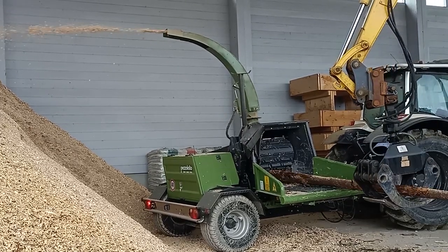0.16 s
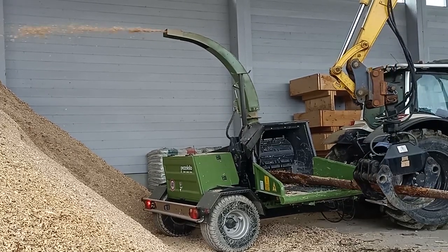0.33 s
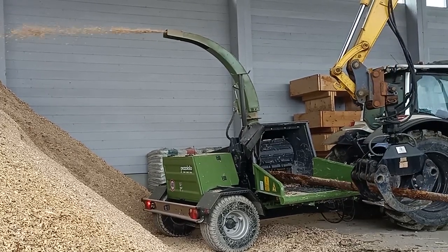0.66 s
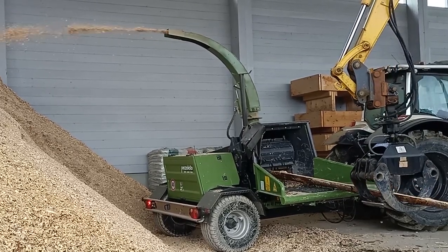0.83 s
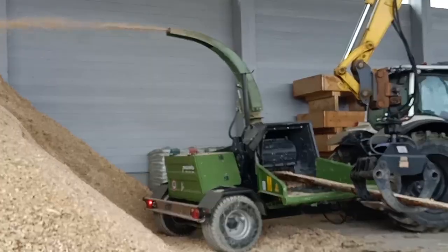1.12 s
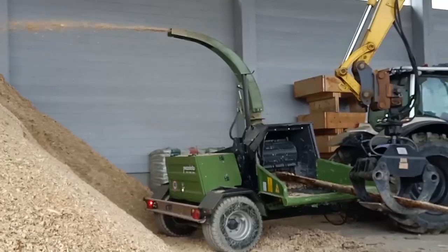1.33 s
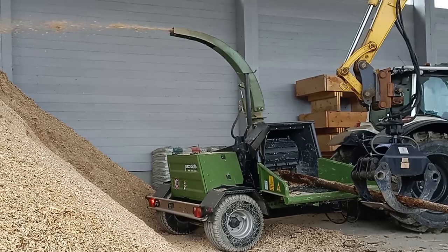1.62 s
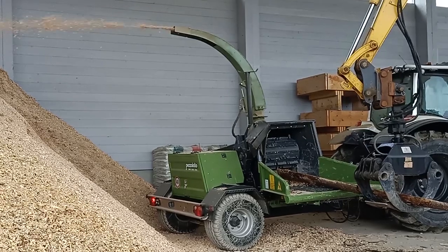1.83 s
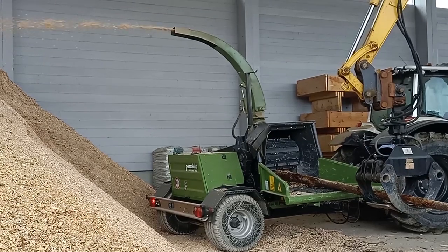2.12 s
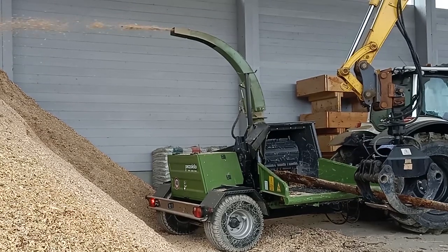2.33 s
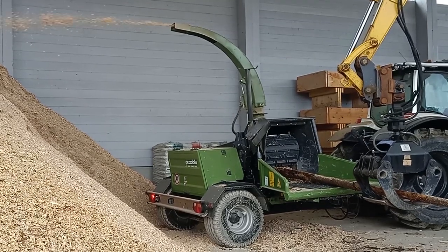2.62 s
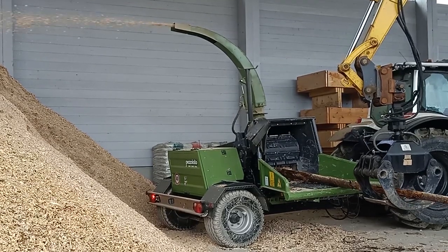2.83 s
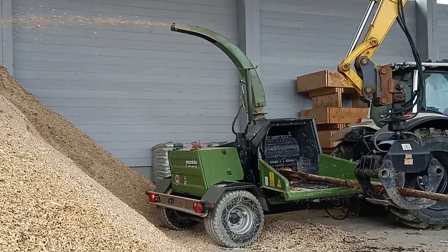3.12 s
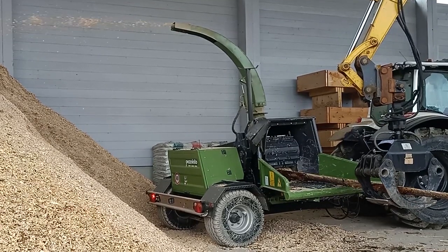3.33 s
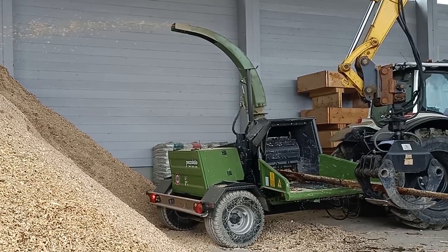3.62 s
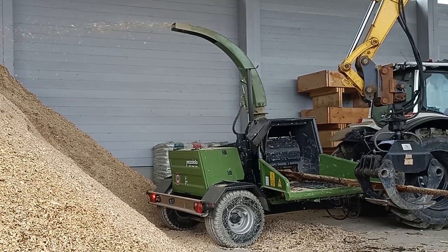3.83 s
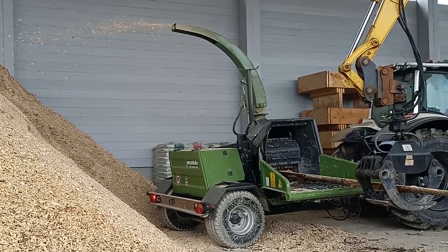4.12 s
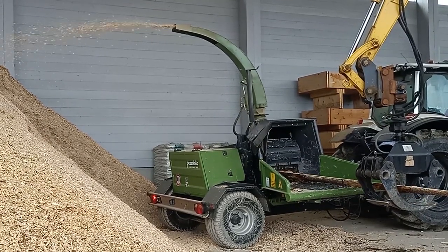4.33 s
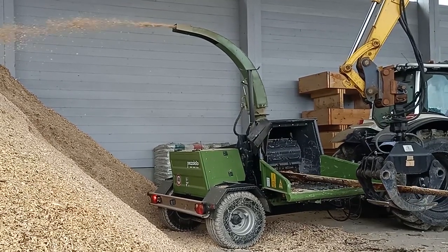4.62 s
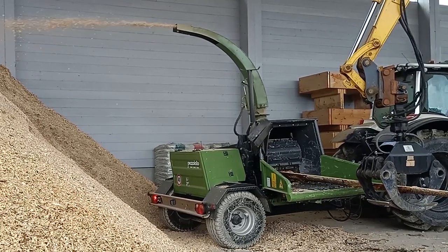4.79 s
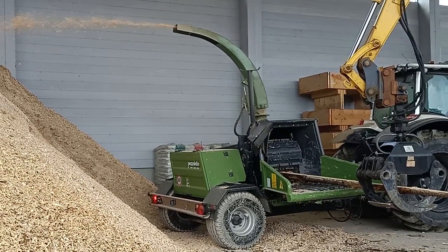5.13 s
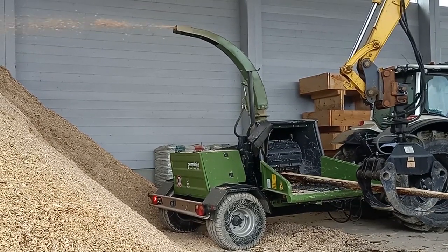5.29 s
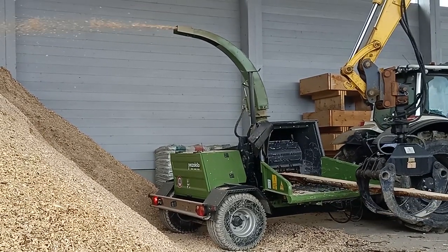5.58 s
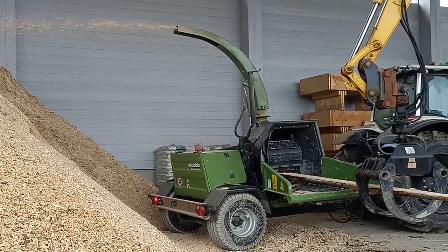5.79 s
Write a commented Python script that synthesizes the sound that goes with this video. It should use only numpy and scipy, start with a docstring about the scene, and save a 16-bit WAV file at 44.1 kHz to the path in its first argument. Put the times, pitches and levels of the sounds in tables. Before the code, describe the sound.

A tractor-driven drum chipper roars and throbs as thick logs bring bursts of hard, rapid chopping and a sagging drum, with blown chips hissing throughout.

```python
"""Wood chipper beside a wall

A tractor-driven drum chipper throbs twice a turn, a sum of harmonics, over the noise roar of blown chips. Thick
logs bring hard chops, made of short sagging rings and thumps, while the drum slows down. Noise bursts tear and
splinter after each chop; small random rings are chips and larger pieces striking. The level of the roar sinks
during the heavy chopping and climbs back slowly afterwards."""
import sys
import numpy as np
from scipy import signal
from scipy.fft import rfft, irfft, next_fast_len
from scipy.io import wavfile
from scipy.ndimage import uniform_filter1d, minimum_filter1d

SR = 44100
rng = np.random.default_rng(int(sys.argv[2]) if len(sys.argv) > 2 else 0)


def materialize(psi):
    """Save the field psi as 16-bit PCM at rate SR to the path in sys.argv[1].

    A 1-D psi becomes a single channel; in a 2-D psi each row is a channel.
    """
    bounded = np.clip(np.atleast_2d(psi).T, -1, 1)
    quanta = np.round(bounded * 32767).astype(np.int16)
    wavfile.write(sys.argv[1], SR, quanta)


N = 262395

# how loud the roar is over time, before load, pulse and flicker: time_s, chips_db (the base level), then
# levels above that base: jet_db (blown air), hiss_db, top_hiss_db
ROAR_LEVELS = [(0, -27.5, -12, -45, -33), (.45, -28, -8.5, -46, -31), (.75, -30, -10, -51, -31),
               (1.1, -27.5, -9, -55, -29), (1.55, -27, -9, -49, -31), (1.95, -24.5, -9.5, -40, -31),
               (2.55, -22, -12, -37, -38), (2.92, -21.5, -11, -31.5, -46), (3.25, -25, -15, -30, -51),
               (3.7, -27.5, -15, -35, -51), (4.1, -29, -14, -39, -47), (4.5, -28, -12.5, -37.5, -37),
               (5.1, -24, -11.5, -36, -38), (5.95, -21, -12, -39, -39)]
# colour of the chips noise: pitch_hz, level_db (per Hz)
CHIPS_COLOUR = [(1200, -8), (1450, -5.5), (1650, -3), (1900, 1.5), (3000, -1), (3400, -5.5), (5150, -12.5),
                (5400, -60)]
USUAL_DB = -26   # the usual level of the chips; some layers swing about it by their own share


def from_db(db):
    """Turn decibels into a gain."""
    return 10 ** (np.asarray(db) / 20)


def rms_one(x):
    """Scale a sound to an average strength (rms) of 1."""
    return x / np.sqrt(np.mean(x ** 2) + 1e-20)


def in_time(rows):
    """Draw each column of a table as a curve over time, one value a sample."""
    time_s, *columns = np.transpose(rows)
    return [np.interp(np.arange(N) / SR, time_s, column) for column in columns]


def at_hz(points, hz):
    """Read a table of levels at any pitch, along a logarithmic pitch scale."""
    pitch_hz, level_db = np.array(points).T
    return np.interp(np.log(hz), np.log(pitch_hz), level_db)


def drift(rate_hz):
    """Slow random wandering of spread 1: noise smoothed twice, on one point every 40 samples."""
    r = np.exp(-80 * np.pi * rate_hz / SR)
    points = rng.standard_normal(N // 40 + 2002)
    slow = signal.lfilter([1], [1, -2 * r, r * r], points)[2000:]   # skip the filter's start
    return np.interp(np.arange(N) / 40, np.arange(len(slow)), rms_one(slow))


def gate(start_s, end_s, edge_s):
    """1 between two times and 0 outside, with soft edges."""
    t = np.arange(N) / SR
    return (np.tanh((t - start_s) / edge_s) - np.tanh((t - end_s) / edge_s)) / 2


def add(out, start_s, sound):
    """Mix a sound in at a given time."""
    i = round(start_s * SR)
    out[i:i + len(sound)] += sound[:N - i]


def noise(colour):
    """Coloured stereo noise, alike on both sides in the bass and unrelated in the treble; mid spread 1."""
    # how alike the two sides are: pitch_hz, likeness (0-1)
    likeness = [(60, .995), (150, .985), (300, .8), (600, .85), (1200, .4), (2500, .17), (5000, .05),
                (12000, .0)]
    # how much louder the left is than the right: pitch_hz, balance_db
    balance = [(60, 0), (120, -.6), (200, -1.6), (380, .3), (690, 1.6), (1280, 1.3), (2360, -1.2),
               (4350, 1.2), (8020, -1), (14800, 7)]
    size = next_fast_len(N)
    hz = np.maximum(np.arange(size // 2 + 1) * SR / size, 1)
    mid, side = rfft(rng.standard_normal((2, size))) * from_db(at_hz(colour, hz))
    alike = np.clip(at_hz(likeness, hz), 0, 1)
    lean = from_db(at_hz(balance, hz) / 2)
    mid, side = np.sqrt(1 + alike) * mid, np.sqrt(1 - alike) * side
    out = irfft(np.array([(mid + side) * lean, (mid - side) / lean]), size)[:, :N]
    return out / np.std(out.mean(axis=0))


def ring(hits, hz, r):
    """Let hits set off a resonance at one pitch, shrinking by the factor r every sample."""
    w = 2 * np.pi * hz / SR
    return signal.lfilter([0, np.sin(w)], [1, -2 * r * np.cos(w), r * r], hits + 1e-18)


def knock(hz, length_s, fall, rise_s):
    """A short burst whose pitch sags through hz, by the share fall, as the blow fades; peak about 1."""
    t = np.arange(round(3 * length_s * SR)) / SR
    bend = 1 + fall * (.5 - np.minimum(t / length_s, 1))
    phase = 2 * np.pi * hz * np.cumsum(bend) / SR
    shape = (1 - np.exp(-(t / rise_s) ** 2)) * np.exp(-(t / length_s) ** 2)
    return np.sin(phase) * shape / shape.max()


def roar(phase, load):
    """Layers of noise that follow the chips, pulsing a little with the drum, each flickering alone."""
    # colours of the layers, from low to high: pitch_hz, level_db (per Hz)
    rumble = [(15, -70), (25, -29), (43, -47), (73, -12), (156, -1), (182, -1), (296, -6.5), (400, -22),
              (520, -20), (880, -120)]
    housing = [(180, -31), (300, -2.5), (394, 0), (504, -5), (622, -0.5), (858, -3), (1010, -4),
               (1250, -4.5), (1600, -11.5), (2080, -25.5), (3520, -120)]
    bright = [(3000, -23), (3400, -2.5), (4200, 1.5), (5150, 6.5), (5400, -45)]   # the bright edge of the chips
    jet = [(6200, -33), (6450, -2.5), (7000, -7.5), (7700, -19.5), (8600, -37.5), (9200, -73)]   # the air jet
    hiss = [(8000, -33), (8700, 8.5), (9700, -2), (11000, -2.5), (11800, -10), (12500, -31)]
    top_hiss = [(9800, -40), (10500, -12), (12000, -10.5), (13600, -1.5), (14300, -8), (15400, -9.5)]
    fill = [(5000, -21), (5230, 9), (6000, 11), (6300, 10), (6500, -53)]   # the band from 5 to 6.5 kHz
    # that band is louder during these spans: start_s, end_s, gain_db
    fills = [(0.71, 0.99, 7), (0.8, 0.94, 2.5), (4.153, 4.45, 7)]
    chips_db, jet_db, hiss_db, top_db = in_time(ROAR_LEVELS)
    swing_db = chips_db - USUAL_DB
    rumble_db = (1.1 - 1) * swing_db - 4.5
    bright_db = (1.47 - 1) * swing_db - 11   # swells faster than the rest
    fill_db = sum(db * gate(start_s, end_s, .01) for start_s, end_s, db in fills) - 16.5
    pulse = 0.094 * np.cos(phase / 2 + 0.5) + np.cos(phase + 0.15)   # once and twice a turn
    # colour, level over the chips_db curve, gain under load (dB), pulse (dB), flicker (dB)
    layers = [
        (rumble, rumble_db, 1.5, 1.5, .6),
        (housing, 1.5, 3.5, 1.2, .6),
        (CHIPS_COLOUR, -1.5, .1, .6, .4),
        (bright, bright_db, .1, .6, .5),
        (jet, jet_db, .1, .6, .9),
        (hiss, hiss_db, -8.0, .3, 1.1),
        (top_hiss, top_db, .1, .3, .6),
        (fill, fill_db, -3.0, .1, .1),
    ]
    out = 0
    for colour, over_db, load_db, pulse_db, flicker_db in layers:
        flicker = drift(2.5) + drift(30)
        level_db = chips_db + over_db + load_db * load + pulse_db * pulse + flicker_db * flicker
        out = out + from_db(level_db) * noise(colour)
    return out


def crackle(chips_db):
    """Chips hit the chute at random, each ringing briefly at one of 24 pitches, apart on each side."""
    hits_per_s, fade_cycles, level_db = 1200, 40, -5   # hits per side; cycles to fade by 60 dB; under chips
    sizes = from_db(3.0 * np.minimum(rng.exponential(1, (2, N)), 3)) * rng.choice([-1, 1], (2, N))
    hits = sizes * (rng.random((2, N)) < hits_per_s / SR)
    dealt = rng.integers(0, 24, (2, N))   # which pitch each hit gets
    out = 0
    for k, hz in enumerate(np.geomspace(900, 5000, 24)):
        r = from_db(-60 * hz / (fade_cycles * SR))
        strength = from_db(at_hz(CHIPS_COLOUR, hz)) * np.sqrt(hz)
        out = out + strength * ring(hits * (dealt == k), hz, r)
    return from_db(chips_db + level_db) * rms_one(out)


def pieces(chips_db):
    """Larger pieces strike all the rings of the housing at once, each ring with a random strength."""
    # what the housing rings with: pitch_hz, level_db (against each other)
    housing_rings = [(470, -4.5), (625, -4), (730, -3.5), (1000, 0), (1280, -12), (1900, -5.5), (2500, -6),
                     (3100, -3), (4300, -13)]
    hits_per_s, fade_s, level_db = 120, .012, -10   # fade by 60 dB; level under the chips
    hits = from_db(2.0 * np.minimum(rng.exponential(1, N), 3)) * (rng.random(N) < hits_per_s / SR)
    r = from_db(-60 / (fade_s * SR))
    out = 0
    for hz, db in housing_rings:
        out = out + from_db(db) * ring(hits * rng.standard_normal(N), hz, r)
    soft = signal.sosfilt(signal.butter(6, 5200, fs=SR, output="sos"), out)
    return from_db(chips_db + level_db) * rms_one(soft)


def drum(chips_db, load):
    """Throb built from harmonics of the drum's speed, suction first; returns it and the pulse phase."""
    # the drum, dragged down by each thick log, and its loudest harmonics before wavering: time_s,
    # throbs_per_s, fifth_db, sixth_db, seventh_db, eighth_db, ninth_db (and tenth),
    # between_db (once-a-turn harmonics in between)
    speed = [(0, 22.4, -30, -25, -34, -40, -36, -45), (.33, 21.7, -30, -25, -36, -42, -36, -45),
             (.52, 20.8, -30, -27, -38, -42, -36, -45), (.8, 24.0, -37, -37, -36, -38, -46, -50),
             (1.0, 25.25, -33, -41, -32, -42, -44, -47), (1.3, 24.8, -35, -40, -31, -41, -39, -46),
             (1.56, 24.3, -45, -34, -32, -40, -38, -42), (1.9, 24.05, -44, -34, -33, -39, -32, -37),
             (2.3, 24.35, -40, -32, -26, -34, -32, -35), (2.65, 24.4, -38, -29, -24, -29, -32, -31),
             (2.95, 24.65, -40, -29, -25, -27, -29, -33), (3.15, 23.5, -32, -28, -27, -32, -29, -36),
             (3.38, 21.7, -28, -22, -32, -36, -34, -40), (3.6, 20.1, -30, -30, -30, -38, -34, -42),
             (3.95, 18.3, -36, -36, -25, -40, -34, -45), (4.1, 18.7, -44, -42, -35, -42, -42, -50),
             (4.2, 20.0, -48, -42, -41, -44, -46, -52), (4.3, 21.0, -48, -29, -40, -40, -46, -52),
             (4.55, 23.4, -43, -30, -31, -38, -42, -45), (4.8, 24.7, -41, -39, -30, -35, -40, -44),
             (5.1, 25.05, -32, -41, -29, -35, -38, -39), (5.3, 24.7, -39, -38, -26, -31, -34, -42),
             (5.5, 24.4, -46, -37, -26, -30, -37, -40), (5.75, 24.05, -35, -28, -27, -33, -31, -33),
             (5.95, 24.4, -36, -32, -25, -31, -29, -38)]
    # the fourth harmonic: multiple, level_db (over the usual chips, before the changes below),
    # share (of the chips' swing, as a factor), load_db (gain under load)
    fourth_harmonic = [(4, -4, 0.25, -11)]
    # the fourth harmonic weakens as its pitch drops below 112 Hz: pitch_hz, level_db
    weakening = [(70, -15), (88, -9), (97, -7.5), (112, 0)]
    # the other harmonics: multiple, level_db (against each other)
    other_harmonics = [(2, -10), (3, -32), (11, 0), (12, -2), (13, -0.5), (14, -3), (16, -4)]
    per_s, fifth_db, sixth_db, seventh_db, eighth_db, ninth_db, between_db = in_time(speed)
    swing_db = chips_db - USUAL_DB
    phase = 2 * np.pi * np.cumsum(per_s) / SR + 0.29
    waver_db, slip = 1.2, .25   # wandering of level (dB) and of phase (radians)

    def wave(k, wander):
        """One harmonic, lagging more the farther it lies from the seventh."""
        return np.cos(k * phase - .3 * (k - 7) ** 2 + wander)

    strong = 0
    for k, db, share, load_db in fourth_harmonic:
        level_db = db + share * swing_db + load_db * load + at_hz(weakening, k * per_s) + 1.5 * drift(4.0)
        strong = strong + np.sqrt(2) * from_db(level_db) * wave(k, slip * drift(2.9))
    loudest = [(5, fifth_db), (5.5, between_db), (6, sixth_db), (6.5, between_db), (7, seventh_db),
               (8, eighth_db), (9, ninth_db), (10, ninth_db)]
    for k, db in loudest:
        level_db = db - USUAL_DB + waver_db * drift(4.6)
        strong = strong + np.sqrt(2) * from_db(level_db) * wave(k, slip * drift(3.3))
    others = sum(from_db(db + waver_db * drift(5.2)) * wave(k, 0.97 * drift(6.1))
                 for k, db in other_harmonics)
    others_db = -10.5 + 1.2 * swing_db + 10 * load
    throb = -strong - from_db(others_db) * rms_one(others)   # minus: suction first
    return from_db(USUAL_DB) * throb, phase


def knife():
    """Each chop rings the housing, leaves wood tearing and splintering, and brings two low thumps."""
    # knife on log: start_s, level_db (of the ring, before a 9 dB cut), pitch_hz, sag (of pitch, 0-1),
    # upper_db (second ring), thump_lag_s, thump_db, second_lag_s, second_db (second thump), splinters_db
    chops = [(0.016, -5, 570, 0.44, -15.5, 0.001, -14, 0.056, -20, -21),
             (0.108, -4, 616, 0.53, -14, .004, -8, 0.053, -12, -27),
             (0.196, -4, 623, 0.3, -14, 0.0073, -19, 0.031, -14, -22),
             (0.289, 1, 630, 0.3, -22, 0.0032, -12, 0.047, -9, -26),
             (0.378, 0, 644, 0.27, -17, 0.013, -10, 0.048, -13, -22),
             (0.475, 0.5, 636, 0.42, -15, .012, -24, 0.038, -13, -29),
             (0.571, -2.5, 593, 0.47, -28, 0.0048, -12, 0.028, -23, -23.5),
             (2.964, -5, 650, 0.13, -19, 0.00079, -12, 0.043, -12, -27),
             (3.037, 0, 723, 0.4, -23, 0.0057, -3.5, 0.051, -10, -42),
             (3.121, 0.5, 630, 0.62, -8, 0.0022, -13, 0.052, -8, -19),
             (3.21, 6, 630, 0.7, -8, 0.0018, -12, 0.049, -16, -25),
             (3.299, 1.5, 643, 0.5, -20, 0.001, -4, 0.03, -20, -20.5),
             (3.388, 3, 677, 0.1, -27, 0.0121, -6, 0.036, -24, -25),
             (3.481, 1, 654, 0, -15, .012, -8.5, 0.045, -10, -22),
             (3.578, -2.5, 705, 0.2, -16, 0.0125, -2, 0.025, -18, -23),
             (3.679, -0.5, 713, 0.03, -18, .015, -2, 0.058, -14, -24.5),
             (3.781, -2, 720, 0.25, -10.5, 0.014, -4, 0.038, -12, -25),
             (3.886, 4.5, 726, 0.32, -10, .0145, -3, 0.045, -9, -22.5),
             (3.995, 0, 750, 0.43, -15, 0.016, -9.5, 0.026, -28, -43)]
    # wood thumps on the feed table: start_s, level_db (before a 12 dB cut), pitch_hz
    table_thumps = [(0.41, -5, 152), (2.262, -2, 230), (2.332, -2, 154), (2.499, -4.5, 240),
                    (2.575, 0.5, 161), (2.662, -11, 165), (2.829, -9, 162), (2.873, -4, 165),
                    (5.097, -26, 166), (5.253, -7, 182), (5.499, -5, 168), (5.659, -13, 250),
                    (5.739, -2.5, 234), (5.829, -4, 169)]
    # lighter bites, in the log and in thin wood: start_s, level_db (before a 10 dB cut), pitch_hz
    grazes = [(0.018, -6.5, 325), (0.108, -4, 330), (0.15, -9, 700), (0.198, -10, 337), (0.229, -11, 1070),
              (0.288, -2, 340), (0.332, -5, 403), (0.387, 1.5, 613), (0.41, -7, 1004), (0.433, -2, 428),
              (0.511, -5, 630), (0.516, 0, 330), (0.527, -3, 260), (0.544, -7, 400), (0.612, -4, 350),
              (0.923, -8.5, 660), (1.003, -9, 690), (1.067, -9.5, 663), (1.242, -9, 686), (1.74, -8, 613),
              (2.151, -7, 630), (2.543, -16, 794), (2.979, -15, 930), (3.084, 3, 646), (3.126, 5, 526),
              (3.152, -1, 840), (3.169, 2, 450), (3.21, 1, 335), (3.241, 0, 880), (3.262, 0, 624),
              (3.284, -8, 620), (3.296, -4, 400), (3.308, -7, 900), (3.351, -8, 960), (3.42, -17, 700),
              (3.515, -15, 690), (3.541, -3, 845), (3.589, -2, 650), (3.645, -12, 726), (3.692, -1, 560),
              (3.712, -5, 756), (3.793, 0, 684), (3.835, -5, 624), (3.894, -10, 620), (3.911, -0.5, 690),
              (3.921, -2, 336), (4.0, 6, 643), (4.023, -4, 876), (4.05, -8, 645), (4.492, -5.5, 635),
              (5.144, -4, 635), (5.308, -8, 680), (5.554, -12, 726), (5.886, -7, 614)]
    # colours of tearing wood and of splinters: pitch_hz, level_db (per Hz)
    tearing_colour = [(90, -13.5), (135, 6.5), (200, -0.5), (260, 9), (330, 9), (430, 7), (600, 8.5),
                      (750, 8.5), (900, 2.5), (1100, 0.5), (1300, -30), (1950, -51), (3300, -120)]
    splinter_colour = [(900, -17.5), (1200, -10.5), (1900, -1.5), (3000, -8.5), (5000, -32), (7500, -24),
                       (9000, -85)]
    ring_s, bite_s = .0119, .003   # fade of the ring; the knife bites a little before the ring is up
    knocks, tearing, splinters = np.zeros((3, N))
    t = np.arange(round(.25 * SR)) / SR
    for s, db, hz, sag, upper_db, lag_s, thump_db, second_s, second_db, splinter_db in chops:
        main_ring = knock(hz, ring_s, fall=sag, rise_s=.0035)
        add(knocks, s - bite_s, from_db(db - 9.0) * main_ring)
        upper_ring = knock(880, ring_s * 0.65, fall=0.32, rise_s=.002)
        add(knocks, s - bite_s / 2, from_db(upper_db) * upper_ring)
        # tearing goes 13 dB under the mean of the chop and its stronger thump
        tear_db = (db + max(thump_db, second_db)) / 2 - 13
        add(tearing, s, from_db(tear_db - 60 * t / .4) * (1 - np.exp(-(t / .01) ** 2)))
        add(splinters, s, from_db(splinter_db - 60 * t / .28) * (1 - np.exp(-(t / .002) ** 2)))
        # a low thump just after each chop, and another about half a turn later, from the second knife
        thump = knock(203.5, length_s=0.0061, fall=0.32, rise_s=0.00081)
        add(knocks, s + lag_s - bite_s, from_db(thump_db) * thump)
        second_thump = knock(209, length_s=0.0071, fall=0.097, rise_s=0.0056)
        add(knocks, s + second_s - 2 * bite_s, from_db(second_db) * second_thump)
    for s, db, hz in table_thumps:
        add(knocks, s, from_db(db - 12.0) * knock(hz, length_s=0.03, fall=0.18, rise_s=0.0029))
    for s, db, hz in grazes:
        add(knocks, s, from_db(db - 10.0) * knock(hz, length_s=0.0088, fall=0.12, rise_s=0.00046))
    grain = from_db(2.2 * drift(42))   # wood gives way in uneven grains
    return knocks, grain * (tearing * noise(tearing_colour) + splinters * noise(splinter_colour))


def yard(x):
    """Dull direct blows and wall and ground echoes; above the bass the right echoes come slightly sooner."""
    # echoes: delay_s, left_db (also the bass on the right), right_db (above the bass)
    echoes = [(.0058, -21, -22), (0.0141, -18, -21), (.029, -18, -18.5), (.047, -17, -17),
              (0.065, -20, -20)]
    x = signal.sosfilt(signal.butter(4, 3000, fs=SR, output="sos"), x)
    upper = signal.sosfilt(signal.butter(2, 300, "high", fs=SR, output="sos"), x)
    out = x + upper * (from_db([[2], [-2]]) - 1)   # above the bass the direct blows lean to the left
    for delay_s, left_db, right_db in echoes:
        add(out[0], delay_s, from_db(left_db) * x)
        add(out[1], delay_s, from_db(left_db) * (x - upper))
        add(out[1], delay_s * 0.98, from_db(right_db) * upper)
    return out


def scene():
    """Roar, drum and knife beside the wall; all but the knocks dip briefly in level at times."""
    # a thick log is in the knives: start_s, end_s
    logs = [(-.2, 0.74), (3.0, 4.16)]
    # the level dips briefly: time_s, depth_db, width_s
    dip_times = [(3.030, -5.5, 0.008), (3.110, -5.5, 0.0082), (3.194, -8.5, 0.010), (3.47, -2, 0.0072),
                 (3.769, -3.5, 0.019)]
    load = sum(gate(start_s, end_s, .027) for start_s, end_s in logs)
    chips_db = in_time(ROAR_LEVELS)[0]
    throb, phase = drum(chips_db, load)
    knocks, tearing = knife()
    t = np.arange(N) / SR
    dips = from_db(sum(db * np.exp(-((t - s) / width_s) ** 2) for s, db, width_s in dip_times))
    # throb and the bass of the knocks lean slightly right; higher knocks still lean left
    lean = from_db([[-.4], [.4]])
    steady = throb * lean + roar(phase, load) + crackle(chips_db) + pieces(chips_db)
    return dips * (steady + tearing) + lean * yard(knocks)


def record(dry):
    """The microphone drops the deep bass, a limiter turns the loudest peaks down, the top is cut."""
    ceiling, limit_s, cutoff_hz = .95, .004, 15450
    thin = signal.sosfilt(signal.butter(2, 70, "high", fs=SR, output="sos"), dry)
    span = round(limit_s * SR)
    peaks = abs(thin).max(axis=0)
    gain = minimum_filter1d(ceiling / np.maximum(peaks, ceiling), 2 * span + 1)
    gain = uniform_filter1d(uniform_filter1d(gain, span), span)   # smooth the gain changes
    top_cut = signal.ellip(12, .5, 80, cutoff_hz, fs=SR, output="sos")
    return signal.sosfilt(top_cut, gain * thin)


dry = scene()
out = record(dry)
materialize(out)
```